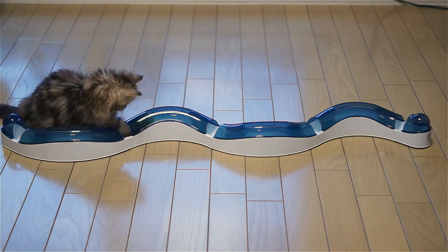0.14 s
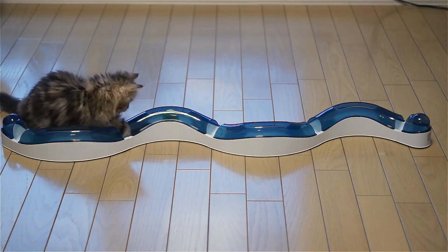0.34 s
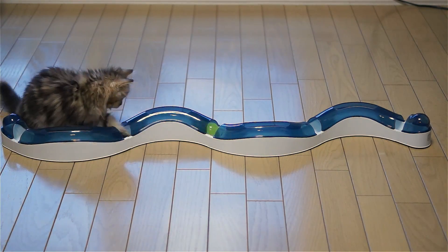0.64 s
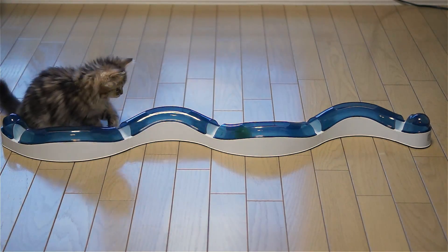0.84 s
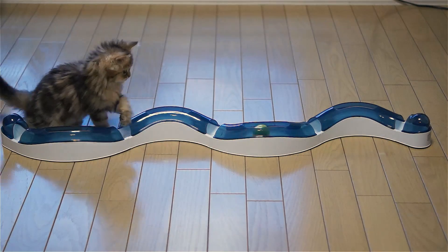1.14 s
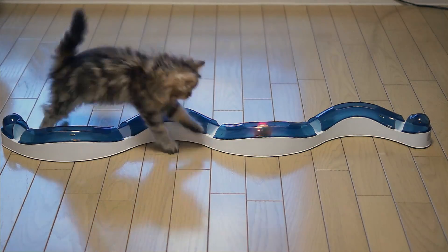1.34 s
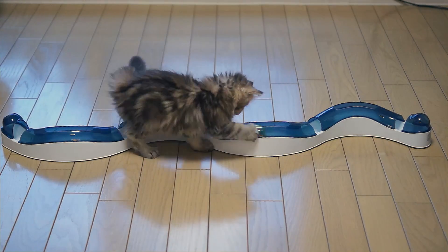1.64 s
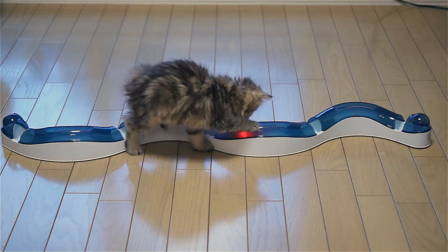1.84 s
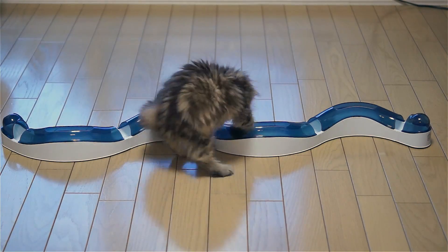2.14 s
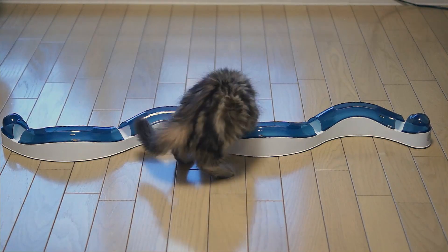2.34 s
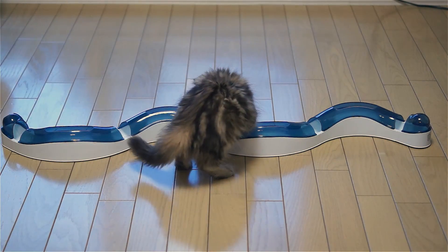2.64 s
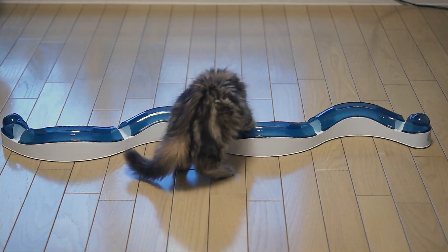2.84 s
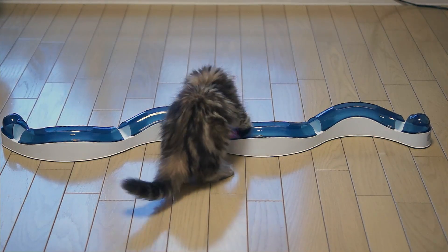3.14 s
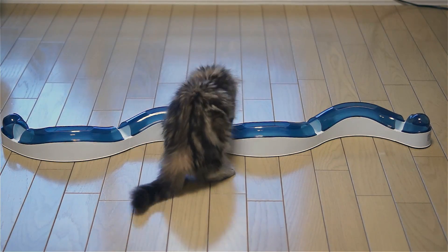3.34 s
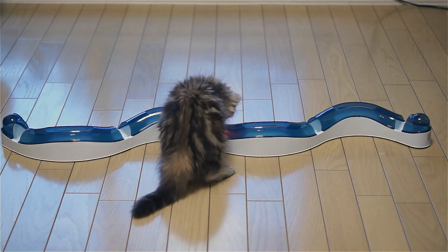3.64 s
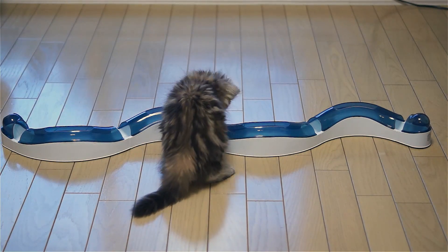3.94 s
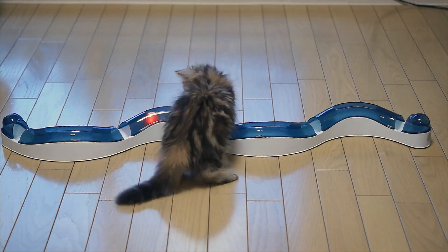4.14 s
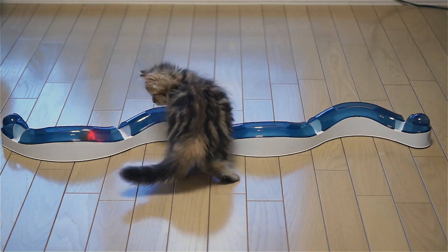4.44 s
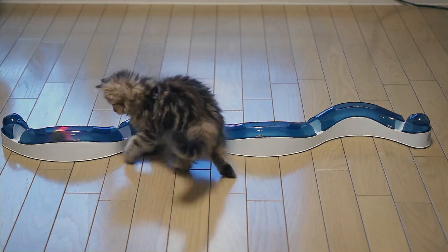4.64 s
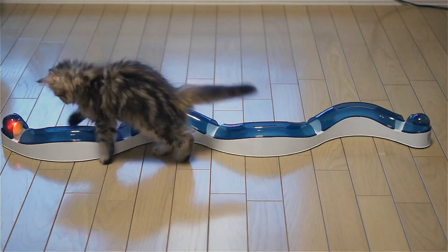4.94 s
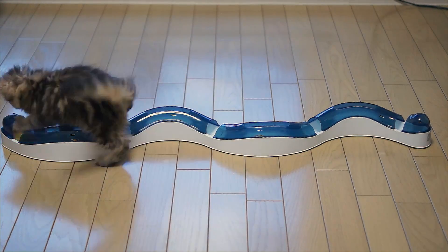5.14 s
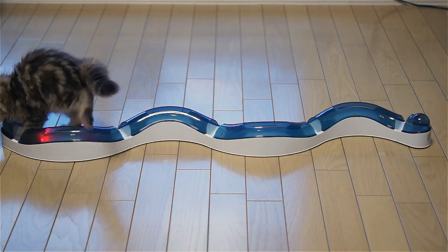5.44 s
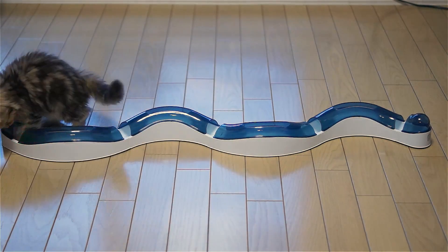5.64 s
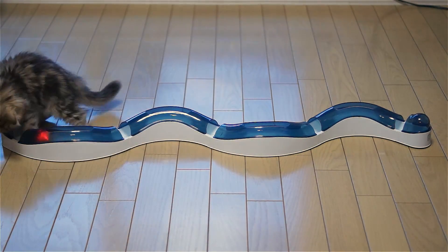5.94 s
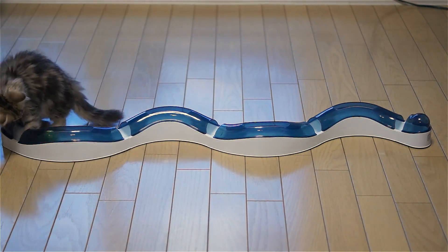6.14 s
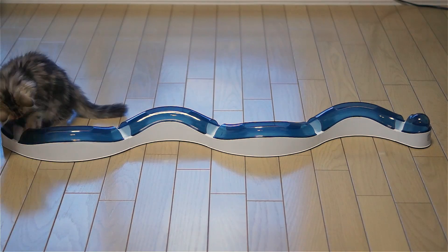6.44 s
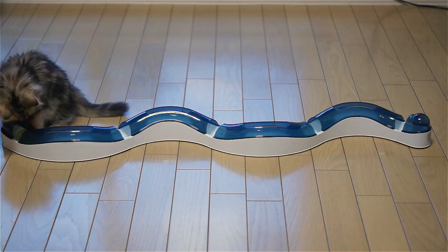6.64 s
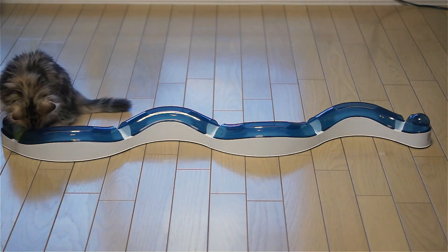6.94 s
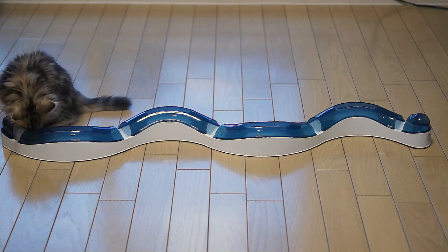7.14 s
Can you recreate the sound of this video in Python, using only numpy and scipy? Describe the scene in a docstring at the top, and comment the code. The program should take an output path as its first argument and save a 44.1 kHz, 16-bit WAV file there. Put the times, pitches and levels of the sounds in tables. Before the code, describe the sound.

Close stereo pickup of a hard ball knocking inside a hollow plastic tube, indoors with short bright reverberation. Dry clacks with fast, fading rebounds alternate with muffled paw nudges, low short rolling, tiny claw scrapes and soft fur brushing. The strongest cluster of clacks arrives a little past the middle, then the play thins to scattered taps. Steady airy fan noise stays underneath throughout.

```python
"""In a bare, lively room a kitten bats a ball along a plastic track on a wooden floor, over a soft fan hum.
Blows and paw nudges excite damped modes of the thin shell and the hollow tube; hard blows add a noise tick.
Rolling, claws and fur are random trains of tiny impulses, filtered; paw landings excite modes of the boards.
Early echoes and a decaying diffuse tail surround the play; the fan is narrow-band noise amid broadband air.
Two close microphones receive it all."""
import sys
import numpy as np
from scipy import signal
from scipy.fft import rfft, irfft
from scipy.io import wavfile

SR = 44100
rng = np.random.default_rng(int(sys.argv[2]) if len(sys.argv) > 2 else 0)


def transcribe(signal):
    """Save signal, clipped to [-1, 1], as a 16-bit WAV file at the path in sys.argv[1]."""
    frames = np.atleast_2d(signal).T
    limited = np.clip(frames, -1, 1)
    pcm = np.round(limited * 32767).astype(np.int16)
    wavfile.write(sys.argv[1], SR, pcm)


N = 321489  # length in samples

# Impacts of the ball on the track. Each row: start in seconds, relative levels of shell clack, hollow ring
# and contact tick in dB, shell brightness in dB per octave, resonance of the struck spot in Hz,
# first rebound delay in seconds, level change per rebound in dB.
KNOCKS = [(0.2062, -32, -38.5, -58, -2.5, 710, .012, -14), (0.2737, -29.5, -32.5, -49, -3.5, 760, 0.02, -2),
          (0.7811, -24.5, -38.5, -49, 0.5, 2170, .033, -8.5),
          (1.6912, -39, -48.5, -53, 3, 1400, 0.016, -13), (1.8922, -39, -44.5, -65, -3, 1250, 0.033, -12),
          (2.0582, -29.5, -46, -60, -1.5, 1287, .0277, -5), (2.109, -27.5, -42, -58, -3, 2200, .0205, -7),
          (2.751, -27, -40, -60, -0.5, 595, .007, -4.5), (4.1044, -29.5, -41.5, -50, -3.5, 1930, .008, -4),
          (4.1578, -24, -19, -40, -3.5, 1250, 0.059, -15.5), (4.344, -22.5, -35, -45, 0, 1940, .012, -26),
          (4.393, -20.5, -26, -36, -0.5, 1700, .0135, -6.5), (4.4478, -30.5, -35.5, -58, -5, 890, .03, -11),
          (5.4453, -29.5, -51, -55, -1, 1800, .008, -6.5), (5.7808, -30, -42.5, -68, 2, 1420, 0.019, -12),
          (6.4303, -26, -33, -48.5, -2.5, 2070, .012, -4), (6.461, -31, -37.5, -55, -2.5, 2030, 0.038, -7)]
# Slow pushes by a soft paw. Each row: start in seconds, relative levels of shell clack and hollow ring in dB,
# build-up of the shell in seconds.
NUDGES = [(0.467, -55, -49, 0.0044), (0.745, -36, -47.5, 0.0088), (2.0063, -36, -56, .004),
          (2.693, -39.5, -48.5, .014), (2.922, -40, -47.5, 0.0097), (2.9627, -44, -54, 0.0066),
          (3.082, -42, -53, .006), (4.313, -32, -44, 0.0063), (4.959, -33, -46.5, 0.0046),
          (5.212, -36, -50, .008), (5.2475, -37.5, -47, .002), (5.3058, -37.5, -59, .002),
          (6.014, -42, -48, .002), (6.716, -44, -56.5, 0.0034), (7.071, -46.5, -55, .01)]
# Modes of the thin plastic shell. Each row: nominal frequency in Hz, relative level in dB, T60 in seconds.
SHELL_MODES = [(419.6, -24, 0.12), (631, -2, 0.02), (782, -3, 0.023), (940, -17, 0.015),
               (1390, -6.5, 0.061), (1609, 9, 0.016), (1900, 4.5, 0.017), (2124, 6.5, 0.013),
               (2339, -5, 0.06), (2645, 0, 0.017), (2940, -1.5, 0.032), (3650, 3, 0.0087),
               (4520, 1.5, 0.0069), (5360, -30, 0.0041)]
# Modes of the hollow of ball and tube. Each row: nominal frequency in Hz, relative level in dB,
# nominal T60 in seconds.
HOLLOW_MODES = [(764, -19, 0.051), (1018, -7.5, 0.035), (1100.4, 2, 0.022), (1219, -9, 0.036),
                (1380, -19, 0.062), (2380, -15, 0.024), (2666, -22.5, 0.026)]
# Spectrum of the contact tick. Each row: frequency in Hz, relative density in dB per Hz.
TICK_SPECTRUM = [(500, -40), (2500, 14), (5000, 4.5), (8000, -1), (12000, -7.5), (14000, -5), (16000, -21)]
# Buzz of the loose lid. Each row: frequency in Hz, relative density in dB per Hz.
BUZZ_SPECTRUM = [(200, -10), (550, -11), (1300, 0), (2500, -2), (3400, -6), (5500, -23), (8000, -64),
                 (15000, -51)]
# Runs of the ball down a slope. Each row: time of full speed in seconds, relative level in dB,
# run-up in seconds.
RUNS = [(0.83, -42.5, 0.49), (2.09, -42.5, 0.24), (2.7, -50.5, 0.37), (4.3, -40.5, 0.36), (4.51, -54, 0.25),
        (5.04, -51.5, 2.2), (5.27, -53.5, 0.63), (5.99, -50.5, 0.19)]
# Spectrum of the rolling. Each row: frequency in Hz, relative density in dB per Hz.
RUMBLE_SPECTRUM = [(100, -37), (300, -13.5), (700, -3), (950, 1), (1120, 3.5), (1450, -9), (2400, -10),
                   (4000, -22), (12000, -46)]
# Claws on plastic. Each row: start in seconds, relative level in dB, length in seconds, centre in Hz.
SCRAPES = [(0.0, -49.5, 0.014, 2600), (0.776, -48, .02, 4440), (1.679, -49.5, 0.038, 1403),
           (2.088, -47, 0.03, 3500), (2.747, -47.5, .011, 4750), (3.334, -51.5, .015, 5370),
           (3.972, -49.5, 0.039, 2140), (4.042, -47, 0.031, 2600), (4.856, -50.5, 0.2, 1674),
           (4.952, -45, 0.0234, 3300), (5.149, -51.5, .08, 2150), (5.411, -53, .04, 1700),
           (5.44, -50, 0.016, 3600), (6.186, -47.5, 0.016, 2500)]
# Fur along the track. Each row: start in seconds, relative level in dB, length in seconds, centre in Hz.
BRUSHES = [(0.252, -54, .037, 6650), (0.59, -57.5, .045, 5400), (1.685, -52, 0.014, 6150),
           (2.63, -58.5, 0.126, 1490), (3.271, -57.5, .12, 1450), (5.18, -64, 0.21, 4000),
           (6.048, -50.5, 0.018, 7260), (6.047, -52.5, 0.13, 3530), (6.358, -53.5, 0.026, 5000)]
# Soft landings of paws. Each row: start in seconds, relative level in dB.
PAWS = [(1.449, -45), (1.459, -42.5)]
# Modes of the floor boards. Each row: nominal frequency in Hz, relative level in dB, T60 in seconds.
BOARD_MODES = [(166, -8, 0.071), (251, -1.5, 0.089), (330, -2, 0.027), (520, -1, 0.023)]
# Position of the play. Each row: time in seconds, left minus right in dB.
PLACE = [(0.3, 0), (0.8, -0.7), (2.8, -0.6), (4.2, -0.5), (5.4, -1), (7.2, -0.5)]
# First echoes from floor, wall and furniture. Each row: nominal delay in seconds, linear gain.
ECHOES = [(.0022, 0.22), (.0066, 0.46), (.0093, 0.2), (.0122, 0.25), (0.016, .45), (.0238, .4)]
# Reverberation time of the room. Each row: frequency in Hz, T60 in seconds.
ROOM_T60 = [(200, 0.26), (1000, 0.41), (2500, 0.41), (6000, 0.4), (14000, 0.22)]
# Likeness of diffuse sound at the two microphones. Each row: frequency in Hz, correlation (no unit).
LIKENESS = [(30, .1), (130, 0.93), (300, 0.72), (1000, 0.46), (2000, 0.3), (4000, 0.11), (8000, 0.21),
            (15000, 0.26)]
# Spectrum of the room's air. Each row: frequency in Hz, relative density in dB per Hz.
AIR_SPECTRUM = [(25, -39), (60, -29.5), (95, -30.5), (125, -21.5), (155, -11.5), (230, -6.5), (400, -11),
                (510, -8), (620, -5), (1000, -9.5), (1500, -13), (2300, -16), (5000, -20), (15500, -26)]
# Tones of the fan. Each row: frequency in Hz, level in dB, full width at half amplitude in Hz.
FAN_TONES = [(334.2, -72.5, 8.7), (393.3, -65, 41), (440.7, -68.5, 17), (605, -69, 36), (1707, -77, 10),
             (2186, -74.5, 15), (2210, -78.5, 11)]

REBOUND_COUNT, GAP_SHARE = 3, 0.7  # each gap is this share of the one before
REBOUND_DULL_DB = -0.5  # brightness change per rebound, dB per octave
KNOCK_RISE_S = 0.00087
HARD_ABOVE_DB, SHARPER_PER_DB = -33, 0.003  # tabled ring level above which pitch rises; share per dB
NUDGE_BRIGHT_DB, NUDGE_SPOT_HZ = -3.5, 1590  # dB per octave; Hz
ROCK_BACK_S, ROCK_BACK_DB = 0.043, -6  # the ball rocks back against the other wall
RUN_UP_DB, SETTLE_DB_PER_S = 20.5, 110  # gain over the run-up; fade once the ball climbs again
ROCKING_DB = -63.5  # floor on the scale of RUNS: the ball keeps rocking in its groove
SCRAPE_OCTAVES, BRUSH_OCTAVES = 0.78, 1.5
AIR_DB = -56
EDGE_HZ = 15850


def knocks(tick_offset_db=-1, tick_decay_s=0.0019, tick_loss_db=-3):
    """Repeated impact: the hard ball ticks and rebounds, each time sooner, softer and duller."""
    out = np.zeros((2, N))
    t = np.arange(SR // 10) / SR
    for s, clack_db, ring_db, contact_db, bright_db, spot_hz, gap, rebound_db in KNOCKS:
        for k in range(REBOUND_COUNT + 1):
            loss_db = k * rebound_db
            noise = colour(rng.standard_normal(len(t)), TICK_SPECTRUM)
            tick_db = contact_db + tick_offset_db + loss_db + k * tick_loss_db
            tick = amp(tick_db) * blow(noise * np.exp(-t / tick_decay_s))
            dull_db = bright_db + k * REBOUND_DULL_DB
            add(out, s, strike(clack_db + loss_db, ring_db + loss_db, dull_db, spot_hz, KNOCK_RISE_S, tick))
            s = s + gap * GAP_SHARE ** k
    return out


def nudges():
    """Slow excitation: a padded paw rings the same plastic without a tick; the ball rocks back once."""
    out = np.zeros((2, N))
    for s, clack_db, ring_db, rise in NUDGES:
        add(out, s, strike(clack_db, ring_db, NUDGE_BRIGHT_DB, NUDGE_SPOT_HZ, rise))
        back = strike(clack_db, ring_db, NUDGE_BRIGHT_DB, NUDGE_SPOT_HZ, rise)
        add(out, s + ROCK_BACK_S, amp(ROCK_BACK_DB) * back)
    return out


def strike(clack_db, ring_db, bright_db, spot_hz, rise, tick=0, shell_db=-11, hollow_db=-2, level_db=5.5):
    """Superposition at one contact: shell clack, hollow ring and any tick, heard in the room."""
    t = np.arange(SR // 10) / SR
    shell = amp(clack_db + shell_db) * clack(t, bright_db, spot_hz, max(rise, 1e-4))
    # a harder blow runs the hollow's time faster: higher pitch and quicker decay
    sharp = 1 + SHARPER_PER_DB * max(ring_db - HARD_ABOVE_DB, 0)
    even = np.ones(len(HOLLOW_MODES))
    hollow = amp(ring_db + hollow_db) * ring(HOLLOW_MODES, t * sharp, even, detune=0.012, rise=0.0014)
    dry_blow = shell + hollow + tick
    wet = room(radiate(dry_blow, corner_hz=312), tail_db=-27.5)
    # the room spreads the blow's energy in time; sqrt(2) counts the two channels
    same_energy = wet * np.linalg.norm(dry_blow) / np.linalg.norm(wet) * np.sqrt(2)
    return amp(level_db) * same_energy


def clack(t, bright_db, spot_hz, rise, buzz_db=-1, buzz_decay=0.0052, spot_db=3, spot_octaves=0.37):
    """Modal excitation of the shell plus the lid's buzz, with the struck panel's resonance on top."""
    mode_hz = np.transpose(SHELL_MODES)[0]
    buzz_hz, buzz_density_db = np.transpose(BUZZ_SPECTRUM)
    # both spectra tilt about 2 kHz
    mode_tilt = bright_db * np.log2(mode_hz / 2000)
    buzz_tilt = bright_db * np.log2(buzz_hz / 2000)
    weights = rng.choice([-1, 1], len(SHELL_MODES)) * amp(mode_tilt)
    tilted = np.transpose([buzz_hz, buzz_density_db + buzz_tilt])
    chatter = colour(rng.standard_normal(len(t)), tilted)
    envelope = (1 - np.exp(-t / rise)) * np.exp(-t / (buzz_decay + rise))
    modes = ring(SHELL_MODES, t, weights, detune=0.029, rise=rise)
    shell = modes + amp(buzz_db) * blow(chatter * envelope)
    return blow(shell + amp(spot_db) * band(shell, spot_hz, spot_octaves))


def ring(modes, t, weights, detune, rise):
    """Damped modes swell as the blow spreads through the body; the struck spot shifts each a little."""
    hz, db, t60 = np.transpose(modes)[:, :, None]
    hz = hz * (1 + detune * rng.standard_normal(hz.shape))
    decay = np.exp(-np.log(1000) * t / t60)
    waves = amp(db) * decay * np.sin(2 * np.pi * hz * t)
    swell = 1 - np.exp(-(t / rise) ** 2)
    return blow(weights @ waves * swell)


def rolling(level_db=-8, bumps_per_s=500):
    """Rolling as random impulses: tiny bumps keep the tube ringing, swelling with speed, then settling."""
    t = np.arange(N) / SR
    runs_db = []
    for s, db, run_up in RUNS:
        below_peak_db = np.maximum(RUN_UP_DB * (s - t) / run_up, SETTLE_DB_PER_S * (t - s))
        runs_db.append(db - below_peak_db)
    level = amp(np.maximum(np.max(runs_db, axis=0), ROCKING_DB) + level_db)
    bumps = rng.standard_normal(N) * (rng.random(N) < bumps_per_s / SR)
    return room(level * unit_rms(colour(bumps, RUMBLE_SPECTRUM)), tail_db=-23.5)[:, :N]


def rubbing(strokes, octaves, level_db, slips_per_s):
    """Stick-slip friction: claw or fur catches and slips in a short train of tiny clicks."""
    out = np.zeros(N)
    for s, db, length, hz in strokes:
        size = int(length * SR)
        slips = rng.standard_normal(size) * (rng.random(size) < slips_per_s / SR)
        slips = slips * signal.windows.tukey(size, 0.4)
        add(out, s, amp(db + level_db) * unit_rms(band(slips, hz, octaves, order=2)))
    return room(out, tail_db=-28.5)[:, :N]


def paws(level_db=-3.0):
    """Modal response of the floor: padded feet thump the boards."""
    out = np.zeros(N)
    t = np.arange(SR // 10) / SR
    for s, db in PAWS:
        thump = ring(BOARD_MODES, t, np.ones(len(BOARD_MODES)), detune=0.038, rise=0.0011)
        add(out, s, amp(db + level_db) * thump)
    return room(radiate(out, corner_hz=200), tail_db=-37)[:, :N]


def radiate(x, corner_hz):
    """Radiation efficiency as a high-pass: a small body pushes out almost no bass."""
    return signal.sosfilt(signal.butter(3, corner_hz, "high", fs=SR, output="sos"), x)


def room(x, tail_db, onset=0.0054, shade_hz=4000):
    """Room impulse response: direct sound from slightly left, first echoes, and a tail that dies by band."""
    size = 2 ** 14
    t = np.arange(size) / SR
    taps = rng.standard_normal((2, size)) * (rng.random(size) < 0.5)
    hz, when, z = signal.stft(unit_rms(diffuse(taps)), SR, nperseg=256)
    z = z * np.exp(-np.log(1000) * when / read(ROOM_T60, hz)[:, None])
    tail = signal.istft(z, SR, nperseg=256)[1][:, :size]
    response = amp(tail_db) * tail * (1 - np.exp(-(t / onset) ** 2))
    # the track's side wall shades the treble on the straight path
    direct = np.exp(-2 * np.pi * shade_hz * t[:SR // 1000])
    direct = direct / direct.sum()
    add(response[0], 0, direct)
    add(response[1], 2 / SR, direct)
    for delay, gain in ECHOES:
        # paths change with the spot on the track
        path_s = delay * (1 + 0.05 * rng.standard_normal())
        add(response, path_s, np.array([gain]))
    return signal.fftconvolve(x[None], response, axes=1)


def diffuse(pair):
    """Spatial coherence: makes two unrelated signals as alike as diffuse sound at the microphones."""
    size = pair.shape[-1]
    a, b = rfft(pair)
    likeness = np.clip(read(LIKENESS, np.fft.rfftfreq(size, 1 / SR)), -1, 1)
    second = likeness * a + np.sqrt(1 - likeness ** 2) * b
    return irfft(np.array([a, second]), size)


def background():
    """Stationary noise: a steady rush of air and hiss, with the fan's wavering narrow-band tones."""
    air_noise = diffuse(rng.standard_normal((2, N)))
    air = amp(AIR_DB) * unit_rms(colour(air_noise, AIR_SPECTRUM))
    hz = np.fft.rfftfreq(N, 1 / SR)
    fan_noise = rfft(diffuse(rng.standard_normal((2, N))))
    peaks = sum(amp(db) * unit_rms(1 / (1 + (2 * (hz - f) / width) ** 2)) for f, db, width in FAN_TONES)
    return air + irfft(fan_noise * peaks, N)


def amp(db):
    """Logarithmic level: decibels to gain."""
    return 10 ** (np.asarray(db) / 20)


def unit_rms(x):
    """Mean power: scales to an rms of one."""
    return x / np.sqrt(np.mean(x ** 2) + 1e-20)


def blow(x):
    """Impulse energy: scales a short sound to the energy of 10 ms at an rms of one."""
    return x * np.sqrt(SR / 100 / (np.sum(x ** 2) + 1e-20))


def read(points, hz):
    """Interpolates a table on a log-frequency axis."""
    f, value = np.transpose(points)
    return np.interp(np.log(hz + 1), np.log(f + 1), value)


def colour(x, spectrum):
    """Linear filtering in the frequency domain by a table of dB."""
    size = x.shape[-1]
    return irfft(rfft(x) * amp(read(spectrum, np.fft.rfftfreq(size, 1 / SR))), size)


def band(x, hz, octaves, order=1):
    """Resonance as a band-pass of gain one, so many octaves wide."""
    edges = np.clip(hz * 2 ** (np.array([-0.5, 0.5]) * max(octaves, 0.1)), 50, SR / 2 - 100)
    return signal.sosfilt(signal.butter(order, edges, "band", fs=SR, output="sos"), x)


def add(mix, s, sound):
    """Superposition: mixes a sound in at time s."""
    part = mix[..., max(round(s * SR), 0):][..., :sound.shape[-1]]
    part += sound[..., :part.shape[-1]]


def scene():
    """Superposition of toy and kitten, with a slowly shifting left-right balance, over the background."""
    balance_db = np.interp(np.arange(N) / SR, *np.transpose(PLACE))
    claws = rubbing(SCRAPES, SCRAPE_OCTAVES, level_db=-6, slips_per_s=2500)
    fur = rubbing(BRUSHES, BRUSH_OCTAVES, level_db=-7, slips_per_s=2200)
    play = knocks() + nudges() + rolling() + claws + fur + paws()
    return play * amp(np.array([balance_db, -balance_db]) / 2) + background()


def record(dry):
    """Band limitation: a linear-phase low-pass removes the extreme treble."""
    low_pass = signal.firwin(511, EDGE_HZ, window=("kaiser", 9), fs=SR)
    return signal.oaconvolve(dry, low_pass[None], "same")


dry = scene()
out = record(dry)
transcribe(out)
```